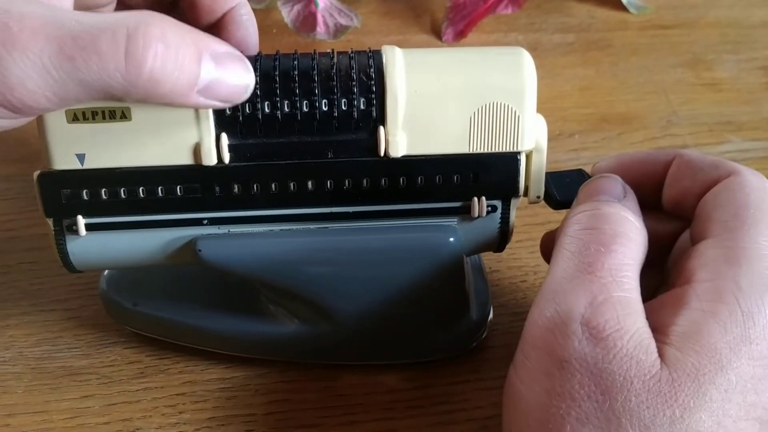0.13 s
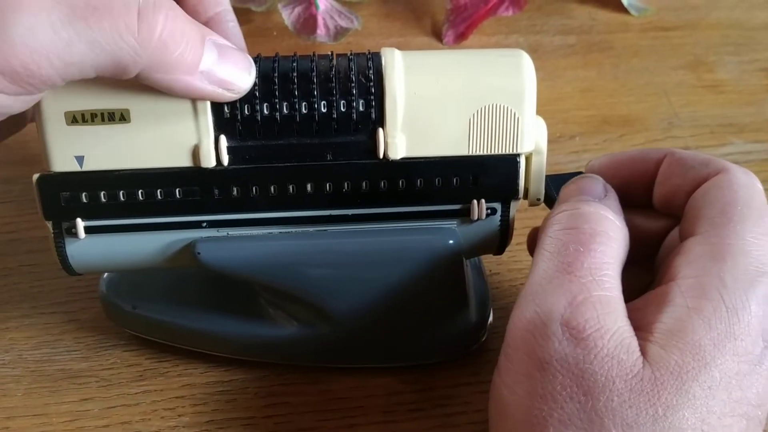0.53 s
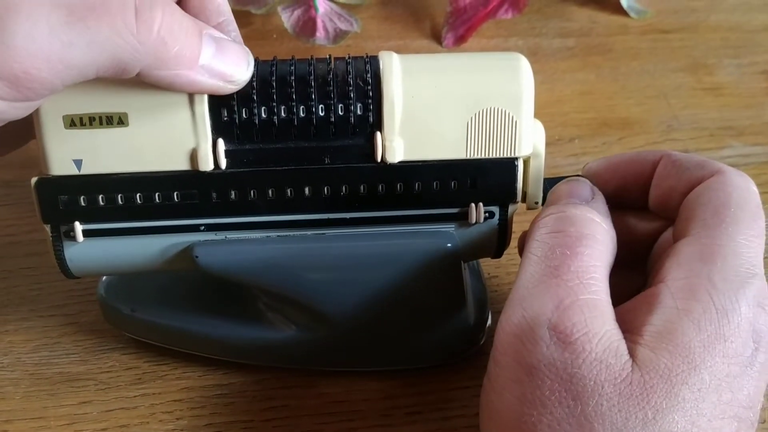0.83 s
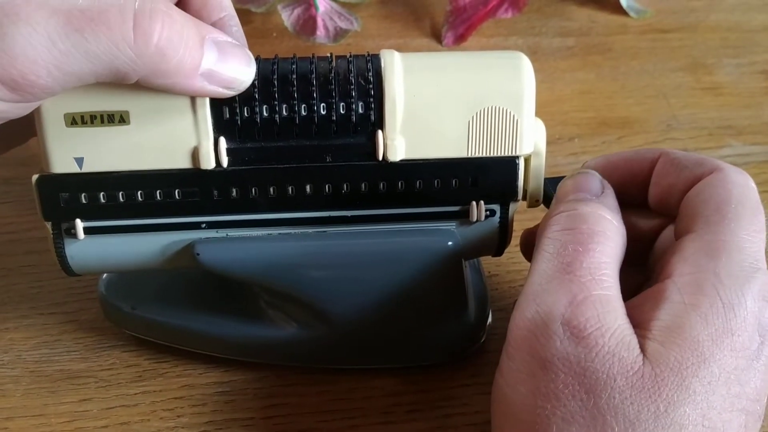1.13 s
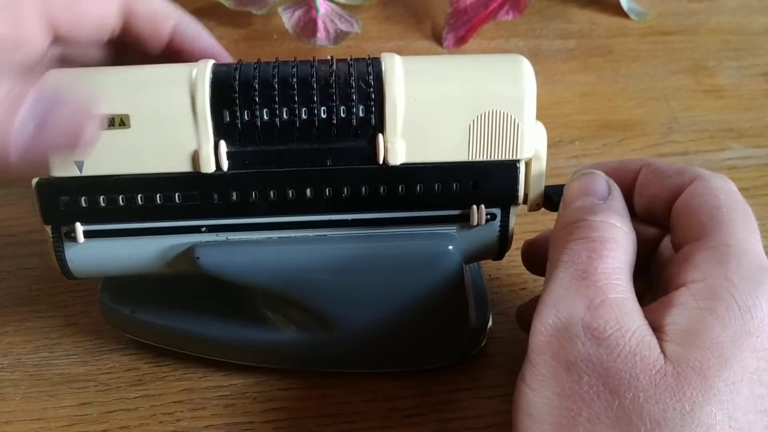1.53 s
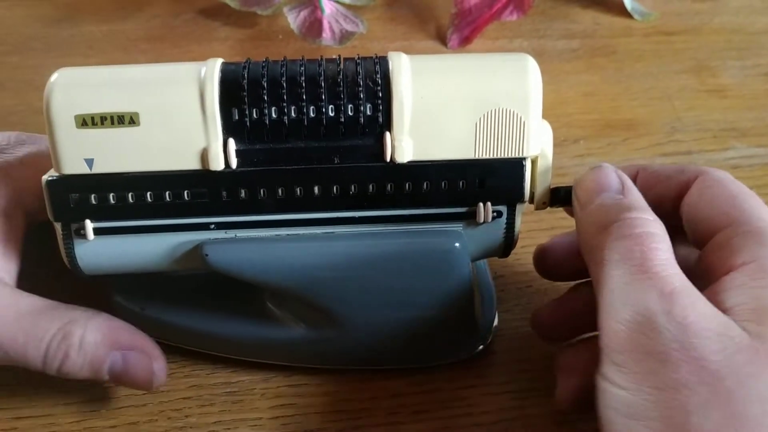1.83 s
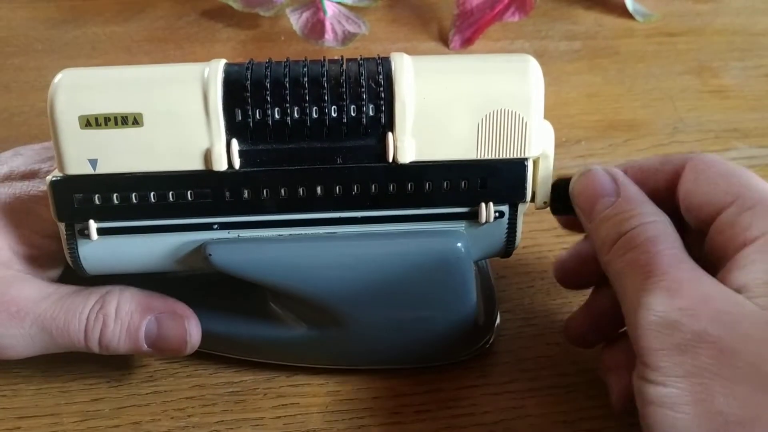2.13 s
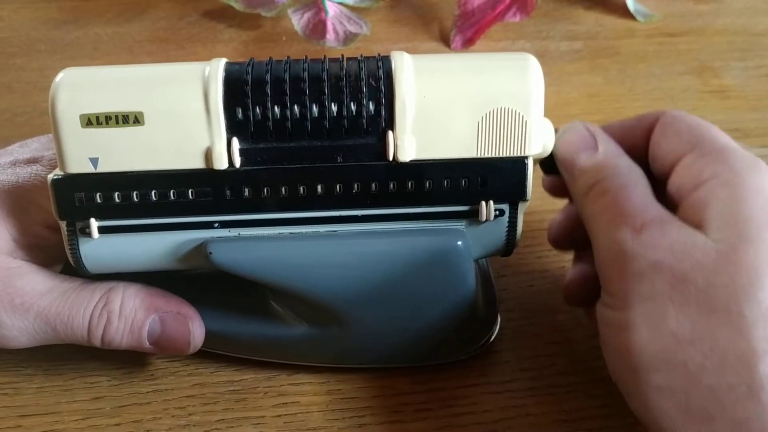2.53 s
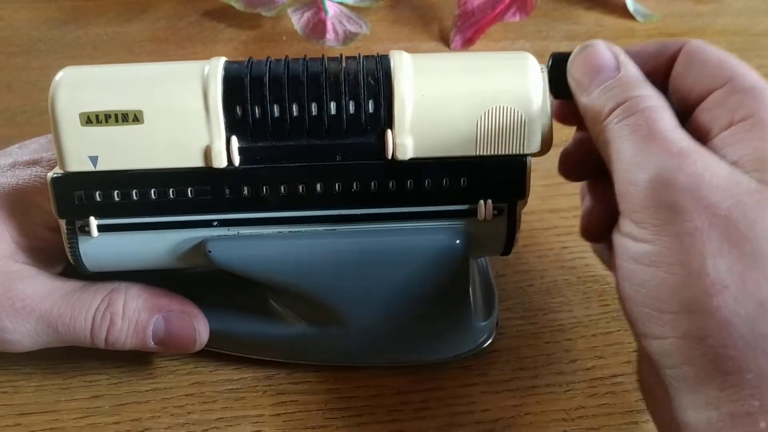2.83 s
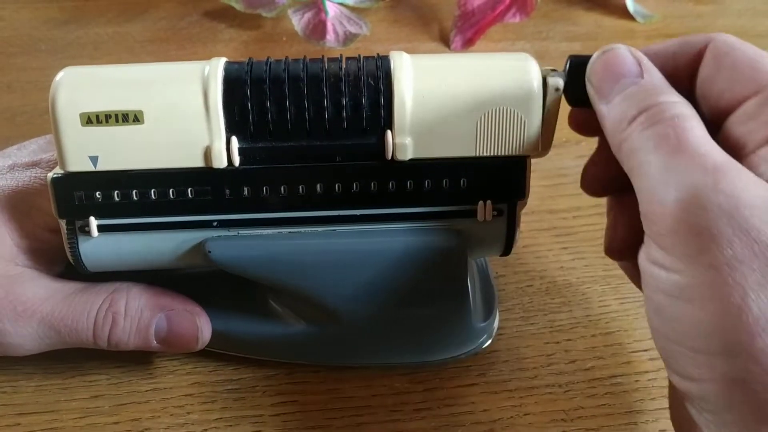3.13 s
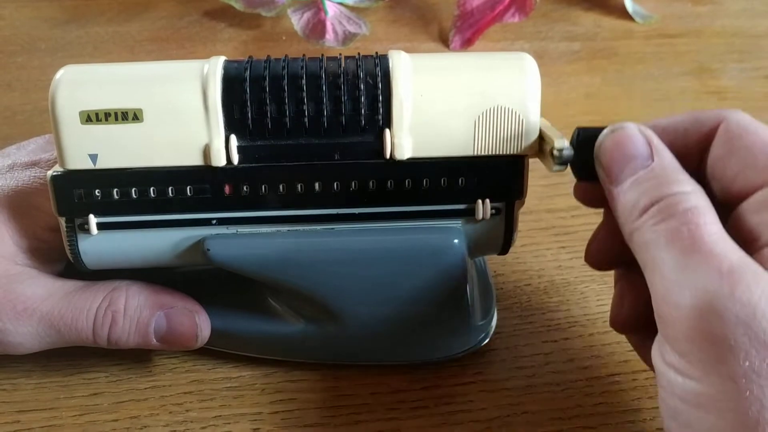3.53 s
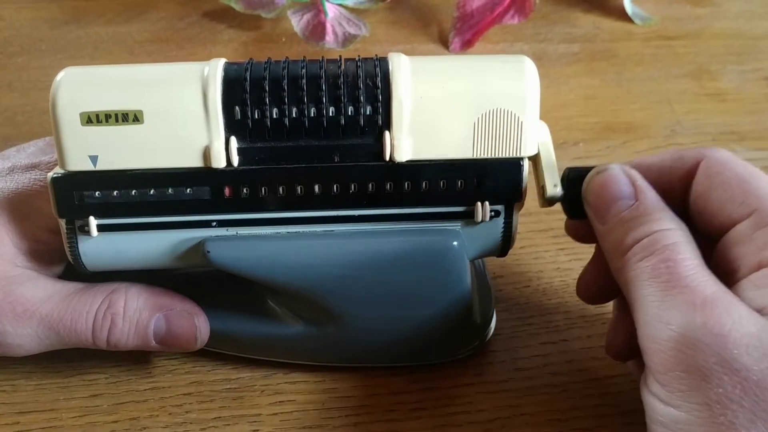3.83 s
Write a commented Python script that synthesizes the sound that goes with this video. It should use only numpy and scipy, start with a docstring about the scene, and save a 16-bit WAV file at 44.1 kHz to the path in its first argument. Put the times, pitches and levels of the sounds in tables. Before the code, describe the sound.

Close up in a small room, a mechanical calculator's lever snaps; a hand slides and bumps the case, then the crank turns with steel clicks, hollow case knocks, low thumps and a final burst of ticking.

```python
"""In a small room, a hand-cranked mechanical calculator stands on a wooden table.
A setting lever snaps into its notch and a hand slides round to steady the case. Then the crank makes one turn:
gears rub, pawls click and clack against the case, the table thumps, and the carry levers rattle at the end.
Rubbing and air are coloured noise; each blow joins short noise bursts with fading tones of steel, case and table."""
import sys
import numpy as np
from scipy import signal
from scipy.fft import rfft, irfft, next_fast_len
from scipy.io import wavfile

SR = 44100
rng = np.random.default_rng(int(sys.argv[2]) if len(sys.argv) > 2 else 0)


def bounce(signal):
    """Save signal as a 16-bit WAV file at the path given by the first command-line argument."""
    frames = np.transpose(np.atleast_2d(signal))
    limited = np.clip(frames, -1, 1)
    pcm = np.round(limited * 32767).astype(np.int16)
    wavfile.write(sys.argv[1], SR, pcm)


N = 176400  # length in samples: 4 s

# How alike left and right are in the air and the room tail: pitch_hz, likeness (0-1)
ALIKE = [(30, 0.16), (120, 1), (300, 0.81), (600, 0.14), (1500, 0.45), (5000, 0.022), (16000, 0.017)]
DETUNE = .021  # random pitch spread of the case, table and hollow tones, as a fraction


def amp(db):
    """Turns decibels into a gain."""
    return 10 ** (np.asarray(db) / 20)


def evened(x):
    """Scales a sound to an rms (average strength) of 1."""
    return x / np.sqrt(np.mean(x ** 2) + 1e-20)


def unit_blow(x):
    """Scales a blow to the energy of 5 ms at rms 1, however long its array is."""
    return evened(x) * np.sqrt(.005 * SR / x.shape[-1])


def read(points, hz):
    """Reads between the points of a table along a log-frequency axis."""
    f, value = np.transpose(points)
    return np.interp(np.log(hz + 1), np.log(f + 1), value)


def level(points):
    """Makes a gain over the whole scene from (time_s, level_db) points."""
    return amp(np.interp(np.arange(N) / SR, *np.transpose(points)))


def add(mix, s, sound):
    """Mixes a sound into both channels, starting at s seconds."""
    part = mix[:, round(s * SR):][:, :sound.shape[-1]]
    part += sound[..., :part.shape[-1]]


def colour(x, spectrum):
    """Filters x to a (pitch_hz, level_db) spectrum without any sound before its start (minimum phase)."""
    size = next_fast_len(x.shape[-1] + 4096)
    hz = abs(np.fft.fftfreq(size, 1 / SR)) + 1
    octaves_below = np.maximum(np.log2(max(spectrum[0][0], 1) / hz), 0)
    octaves_above = np.maximum(np.log2(hz / spectrum[-1][0]), 0)
    # beyond both ends it falls 20 dB per octave, down to -100 dB
    db = np.maximum(read(spectrum, hz) - 20 * (octaves_below + octaves_above), -100)
    log_gain = np.log(amp(db))
    response = np.exp(np.conj(signal.hilbert(log_gain)))[:size // 2 + 1]
    return irfft(rfft(x, size) * response, size)[..., :x.shape[-1]]


def noise_pair(size, alike):
    """White noise in two channels; the right one shares the given part of the left one."""
    a, b = rfft(rng.standard_normal((2, size)))
    alike = np.clip(alike, -1, 1)
    return irfft(np.array([a, alike * a + np.sqrt(1 - alike ** 2) * b]), size)


def grainy(size, per_s, spread_db, share, alike=.33):
    """Rubbing noise whose strength follows tiny irregular ticks."""
    tick_t60_s = .012
    tick_gain = amp(spread_db * np.minimum(rng.exponential(1, size), 3))
    ticks = (rng.random(size) < per_s / SR) * tick_gain
    # each tick leaves a short fading trail
    grain = evened(signal.lfilter([1], [1, -amp(-60 / (tick_t60_s * SR))], ticks))
    return noise_pair(size, alike) * (1 - share + share * grain)


def low_cut(x):
    """A gentle high-pass at 89 Hz keeps the deepest bass out."""
    return signal.sosfilt(signal.butter(2, 89, "high", fs=SR, output="sos"), x)


def ring(modes, t, detune):
    """Fading tones of a struck body, with pitches and levels a little different each time."""
    level_spread_db = 2
    total = 0
    chance = rng.standard_normal((len(modes), 2))
    for k, ((hz, db, t60), (a, b)) in enumerate(zip(modes, chance)):
        fade = amp(db + level_spread_db * b - 60 * t / t60)
        # every other tone starts downwards
        total = total + (-1) ** k * fade * np.sin(2 * np.pi * hz * (1 + detune * a) * t)
    return total


def air():
    """Low room noise and a thin hiss: steady coloured noise with a slowly changing level."""
    # Colour of the room air: pitch_hz, level_db (per Hz, relative)
    air_colour = [(25, -44), (55, -44), (72, -32), (95, -20), (125, -25), (165, -15), (210, -3), (250, -2),
                  (280, 0), (315, -9), (360, -7), (480, -14), (830, -17), (1100, -22), (3000, -24),
                  (16000, -25)]
    # Its level: time_s, level_db
    air_level = [(0, -55.5), (.65, -56), (1.1, -58.5), (1.85, -59.5), (3, -58.5), (4, -57.5)]
    left_late_s = .00034
    alike = read(ALIKE, np.fft.rfftfreq(N, 1 / SR))
    left, right = evened(colour(noise_pair(N, alike), air_colour))
    return level(air_level) * np.array([np.roll(left, round(left_late_s * SR)), right])


def room(x):
    """Echoes off the room blur into a short tail that swells just after each sound; each pitch fades at its own rate."""
    # Reverberation: pitch_hz, t60_s (time to fade by 60 dB), level_db (relative)
    tail_bands = [(157, 0.78, 4), (397, 0.24, -9), (1050, 0.33, -15), (2900, 0.25, -16.5),
                  (7600, 0.21, -16.5), (15000, 0.12, -19)]
    gap_s, swell_s = .011, .014
    size = SR * 3 // 5
    noise = noise_pair(size, read(ALIKE, np.fft.rfftfreq(size, 1 / SR)))
    hz, t, z = signal.stft(noise, SR, nperseg=256)
    t60 = read([(f, s) for f, s, _ in tail_bands], hz)[:, None]
    band_gain = amp(read([(f, db) for f, _, db in tail_bands], hz))[:, None]
    shape = amp(-60 * t / t60) * np.clip((t - gap_s) / swell_s, 0, 1)
    # equal energy in every band first, then its level
    shape *= band_gain / np.sqrt(size * np.mean(shape ** 2, axis=1, keepdims=True))
    tail = signal.istft(z * shape, SR, nperseg=256)[1]
    return signal.fftconvolve(x, tail, axes=1)[:, :N]


def hand():
    """The hand slides along the case with a fine rustle, drags as it lets go and bumps it softly with a hollow ring."""
    # Skin sliding on the case: time_s, level_db
    slide_level = [(1.38, -60.5), (1.55, -58), (1.7, -56.5), (1.82, -59.5), (1.95, -57.5), (2.08, -56.5),
                   (2.2, -58), (2.3, -61)]
    # Colour of the slide: pitch_hz, level_db (per Hz, relative)
    skin_colour = [(500, 0.5), (2000, -2.5), (4500, -4.5), (8000, -3.5), (15500, -5.5)]
    # The palm drags as it lets go: time_s, level_db
    drag_level = [(1.42, -78), (1.45, -56.5), (1.5, -60.5), (1.58, -56.5), (1.66, -66.5), (1.73, -68.5),
                  (1.8, -79)]
    # Colour of the drag: pitch_hz, level_db (per Hz, relative)
    palm_colour = [(200, 0), (330, 2.5), (450, -1), (560, 7.5), (680, -9.5), (950, -8.5), (1600, -19)]
    # Soft bumps as the hand lets go: start_s, level_db
    bumps = [(1.445, -47), (1.521, -59), (1.553, -57), (1.598, -53)]
    # Hollow ring of the bumps: pitch_hz, level_db (relative), t60_s
    hollow_tones = [(549, 3.5, 0.079), (590, 6, 0.064), (790, -4, 0.06), (990, -8, 0.054)]
    rustle = grainy(N, per_s=600, spread_db=2, share=.2, alike=.034)
    slide = level(slide_level) * evened(colour(rustle, skin_colour))
    drag = level(drag_level) * evened(colour(noise_pair(N, .39), palm_colour))
    out = slide + drag
    t = np.arange(SR // 4) / SR
    for s, db in bumps:
        add(out, s, amp(db) * unit_blow(low_cut(ring(hollow_tones, t, DETUNE))))
    return out


def gears():
    """The gears rub as long as the crank turns: noise roughened by irregular ticks of the teeth."""
    # Friction while the crank turns: time_s, level_db
    friction_level = [(2.2, -80), (2.4, -56), (2.5, -63), (2.55, -50.5), (2.68, -55), (2.8, -58.5),
                      (3.0, -59.5), (3.28, -60), (3.58, -65), (3.66, -64), (3.76, -68), (4, -83)]
    # Colour of the friction: pitch_hz, level_db (per Hz, relative)
    gear_colour = [(60, -19), (110, -11), (200, 16), (450, 2.5), (800, 10.5), (1200, 7.5), (2500, -1),
                   (4500, -0.5), (8000, -3), (15500, -4)]
    rub = grainy(N, per_s=420, spread_db=3.5, share=.55)
    return level(friction_level) * evened(colour(rub, gear_colour))


def rocking():
    """The machine rocks on the table: a low rumble swells and dies, loose parts chatter and springs jangle."""
    # Rocks: start_s, rumble_db and chatter_db (before fading), swell_s and t60_s of the rumble,
    # spring_db (before halving); in the order start_s, rumble_db, swell_s, t60_s, chatter_db, spring_db
    rocks = [(2.578, -52, 0.011, 0.73, -42, -53), (3.109, -48, 0.0096, .43, -41, -48),
             (3.356, -40, 0.023, 0.3, -47, -58)]
    # Colour of the rumble: pitch_hz, level_db (per Hz, relative)
    rumble_colour = [(40, -34), (100, -33), (165, 4), (240, 3), (320, 3.5), (450, -12.5), (900, -23.5)]
    # Colour of the chatter: pitch_hz, level_db (per Hz, relative)
    chatter_colour = [(250, -16), (500, 4.5), (900, -12), (1400, -5), (2200, 3.5), (4000, -3.5),
                      (9000, -37)]
    # Tones of the shaken springs: pitch_hz, level_db (relative), t60_s
    spring_tones = [(1060, -3, 0.38), (1330, -8, .3), (1415, 0, 0.44), (1620, -3, 0.5), (1900, -5, 0.42),
                    (2130, -1.5, 0.4)]
    chatter_t60_s, chatter_rise_s = .084, .0016
    out, t = np.zeros((2, N)), np.arange(SR // 2) / SR
    onset = np.minimum(t / chatter_rise_s, 1)
    for s, db, swell, t60, chatter_db, spring_db in rocks:
        shape = np.minimum(t / swell, 1) * amp(-60 * np.maximum(t - swell, 0) / t60)
        rumble = evened(colour(noise_pair(len(t), .97), rumble_colour))
        add(out, s, amp(db) * shape * rumble)

        rattle = grainy(len(t), per_s=170, spread_db=4, share=.85)
        chatter = evened(colour(rattle, chatter_colour))
        add(out, s, amp(chatter_db) * onset * amp(-60 * t / chatter_t60_s) * chatter)

        # slightly different tones left and right
        jangle = np.array([ring(spring_tones, t, .0051), ring(spring_tones, t, .0043)]) / 2
        add(out, s, amp(spring_db) * onset * jangle)
    return out


def steel_click(t, envelope, ring_db, tick_db):
    """Stiff steel has crowded high tones: three bands of noise bursts, also sent through the ringing frame."""
    # Dense steel tones, lowest group: pitch_hz, level_db (per Hz, relative)
    clack_colour = [(1400, -22), (2100, 3), (2700, 8), (3500, 11), (4350, 6), (5000, 7.5), (6200, -42)]
    # Middle group: pitch_hz, level_db (per Hz, relative)
    ring_colour = [(4000, -39), (5100, -8.5), (6000, -1.5), (7000, -3), (8300, 1), (9800, -9),
                   (11500, -30.5)]
    # Highest group: pitch_hz, level_db (per Hz, relative)
    tick_colour = [(8500, -2), (10200, -3), (12000, -0.5), (14000, -3), (15800, -3.5), (17500, -41)]
    # Strongest tones of the steel frame: pitch_hz, level_db (relative), t60_s
    frame_tones = [(2700, -2, .018), (4250, 1, .018), (4550, 0, .016), (5400, -2, .016), (5930, 0, .018),
                   (6850, -3, .016), (7780, -1, .016), (8720, -1, .016), (11450, -1, .016),
                   (12150, 0, .016), (13050, -1, .016), (13800, 0, .016), (15250, -1, .016)]
    frame_db, frame_detune = -8, .012
    steel = 0
    for group, db in [(clack_colour, 0), (ring_colour, ring_db), (tick_colour, ring_db + tick_db)]:
        steel = steel + amp(db) * colour(noise_pair(len(t), .6) * envelope, group)
    frame_ring = np.array([ring(frame_tones, t, frame_detune), ring(frame_tones, t, frame_detune)])
    frame = signal.fftconvolve(steel, frame_ring, axes=1)[:, :len(t)]
    return evened(steel) + amp(frame_db) * evened(frame)


def case_knock(t, attack, envelope, hard_db):
    """The case rings in a few tones with an equally strong rattle; a harder knock lifts the higher ones."""
    # Tones of the case: pitch_hz, level_db (relative, before hardness), t60_s
    case_tones = [(703, -5.5, 0.032), (1015, -1.5, 0.0051), (1086, 0.5, 0.063), (1174, -2.5, 0.024),
                  (1493, -6, 0.056), (1500, -5, 0.046), (2000, -5.5, 0.0066)]
    middle_hz = case_tones[2][0]
    case = [(hz, db + hard_db * np.log2(hz / middle_hz), t60) for hz, db, t60 in case_tones]
    burst = noise_pair(len(t), .6) * envelope
    rattle = colour(burst, [(hz, db) for hz, db, _ in case])
    return evened(ring(case, t, DETUNE) * attack) + evened(rattle)


def table_thump(t, attack):
    """The wooden table answers a blow with low, quickly fading tones."""
    # Tones of the table: pitch_hz, level_db (relative), t60_s
    table_tones = [(162.1, -12.5, 0.15), (231, -8, 0.15), (297, -7, 0.081), (390, -4, .022)]
    return ring(table_tones, t, DETUNE) * attack


def part_note(t, attack, hz):
    """The struck part sounds one short fading note."""
    part_t60_s = .02
    return np.sin(2 * np.pi * hz * t) * attack * amp(-60 * t / part_t60_s)


def blow(rise, t60, thump_db, knock_db, hard_db, steel_db, ring_db, tick_db, pan_db, part_hz, part_db):
    """Steel strikes steel: a bright click, the note of the struck part, a knock of the case and a thump of the table."""
    thump_trim_db, knock_trim_db, steel_trim_db, part_trim_db = -2, -1, -.5, -2.5
    choke = 1.3  # parts held in contact choke a click faster and faster (power of time)
    crack_db, crack_s = -3, .0005  # each click opens with a very short crack
    t = np.arange(8192) / SR
    rise = max(rise, 1 / SR)
    attack = np.minimum(t / rise, 1) ** 2
    after = np.maximum(t - rise, 0)
    decay = amp(-60 * (after / t60) ** choke) + amp(crack_db) * np.exp(-after / crack_s)
    envelope = attack * decay

    steel = unit_blow(steel_click(t, envelope, ring_db, tick_db))
    knock = unit_blow(case_knock(t, attack, envelope, hard_db))
    thump = unit_blow(table_thump(t, attack))
    part = unit_blow(part_note(t, attack, part_hz))

    metal = amp(steel_db + steel_trim_db) * steel + amp(knock_db + knock_trim_db) * knock
    metal = metal + amp(part_db + part_trim_db) * part
    # the metal sits to one side, the thump in both channels alike
    sides = amp([[pan_db / 2], [-pan_db / 2]])
    return sides * metal + amp(thump_db + thump_trim_db) * thump


def mechanism():
    """All blows of levers and pawls, each from its own place; they reach the left side slightly late."""
    # Blows inside the machine: start_s, rise_s, click_t60_s, thump_db (table), knock_db (case),
    # hardness (dB per octave), steel_db, ring_over_clack_db, tick_over_ring_db, left_minus_right_db (metal only),
    # part_pitch_hz, part_db; blow() trims the thump, knock, steel and part levels
    blows = [(0.7282, 0.00032, 0.0082, -80, -51, -12, -28.5, 16, 2.5, -3, 1080, -43),
             (0.7362, 0.00052, .012, -84, -47.5, 1, -38, 8.5, 2, 15.5, 3250, -45.5),
             (0.7394, 0.0019, 0.0081, -69, -50, 14, -39, 11, 3, -17, 1156, -49),
             (0.962, 0.00063, .0135, -88, -54.5, 14, -60, 2, -12, 0, 1050, -71),
             (1.716, 0.0011, 0.014, -64, -66, 2, -46, 10, 2, -2.5, 1450, -58),
             (2.064, 0.01, .027, -64, -65, 0, -50.5, 17, -5, -9, 6850, -56),
             (2.147, 0.0055, 0.041, -75, -80, 5, -52.5, 5, -4, -15, 7800, -59),
             (2.196, 0.0002, 0.017, -47.5, -46, -1, -42.5, 2, -5, -2.5, 1470, -48),
             (2.29, 0.00031, 0.0059, -49.5, -38.5, 14, -29, 6, -11, -3.5, 1060, -44),
             (2.3231, .0003, 0.021, -63, -46.5, 14, -65, 0, -16, -5.5, 2590, -52),
             (2.379, 0.00047, .0135, -64, -58, 4, -44, 13, 2, 3, 4500, -59),
             (2.388, 0.00024, .0135, -43.5, -38, 32, -41, 5, -10, -6, 1250, -40),
             (2.4137, 0.00015, 0.014, -50, -53, -6, -52, -4, 5, -4, 2100, -47),
             (2.5561, 0.00047, 0.023, -50, -32, 16, -33.5, 12, -3.5, 1, 1530, -37),
             (2.5658, 0.0014, 0.026, -46, -34.5, 5, -34.5, 3.5, 0, -4, 2070, -36),
             (2.5757, 0.0018, 0.019, -62, -43, 13, -40, 9, -6, -6.5, 2880, -33.5),
             (2.582, 0.00045, 0.014, -53, -45, -14, -57, 5, -6, -3, 1280, -48),
             (2.598, 0.00051, 0.011, -44, -63, 9, -63, 0, -10, -4, 1550, -47),
             (2.6452, 0.00066, .012, -49.5, -49.5, -3, -61, 5, -10, -1, 1230, -58),
             (2.651, 0.00053, 0.01, -48, -62, 1, -52, 16, -13, -1, 4500, -60),
             (2.688, 0.00046, 0.014, -50, -52.5, 13, -60, 12, -8, -5, 7840, -55),
             (2.7118, 0.00083, .01, -44.5, -54, -4, -61, 13, -7, -7, 4450, -60),
             (2.7401, 0.00098, .013, -49.5, -63, 4, -56.5, 20, -10, -4, 1160, -57),
             (2.8314, 0.0019, 0.015, -50.5, -53, -3, -54, 0, -6, -14, 1030, -55),
             (2.836, 0.001, 0.018, -45.5, -42.5, -1, -41.5, 7, -6, -2, 2080, -42.5),
             (2.965, 0.0011, 0.018, -54.5, -44.5, 0, -44.5, 3, 0, -0.5, 1087, -40),
             (2.9723, 0.00021, 0.012, -46, -48.5, -17, -45.5, -3, -12, -7, 1070, -49),
             (3.095, .0009, 0.028, -70, -44, 9, -33, 7, 1, 11, 5330, -38),
             (3.101, 0.00019, 0.0089, -66, -34.5, 8.5, -27.5, 10.5, -10, -7, 4370, -32.5),
             (3.1034, 0.00032, 0.011, -42, -31.5, -3, -32.5, 11, -3, -.5, 1420, -27.5),
             (3.1072, 0.00067, 0.01, -43.5, -43, 6, -33, 10, -1, 6, 650, -41.5),
             (3.2882, 0.00054, 0.025, -45.5, -73, 4, -36, 26, 7, 0, 4400, -48.5),
             (3.2931, 0.0016, .0135, -67, -43.5, 4, -41.5, 4, 7.5, -1.5, 1580, -49),
             (3.346, 0.00069, 0.006, -63, -38.5, 1, -33.5, 14, -6, -4, 1095, -37.5),
             (3.3484, 0.00045, 0.007, -42.5, -46, 5, -34.5, 13, -2, 7, 4420, -35.5),
             (3.352, 0.00035, 0.013, -36, -43, 6, -20.5, 16.5, -0.5, -3, 2700, -48),
             (3.647, 0.0039, 0.033, -58, -59, 2, -49.5, 3, 10, -3, 1500, -62),
             (3.7185, .0007, 0.033, -52.5, -49, 2, -41, 2, 7.5, -2, 6400, -50),
             (3.7301, 0.00051, 0.018, -49.5, -41, -4, -49, 7, -8, -2, 1100, -37),
             (3.7966, 0.0023, 0.012, -60, -65, 4, -28, 3, 12, -6, 3110, -38),
             (3.8076, 0.00055, 0.0074, -63, -59, 9, -37, 10, 0, 0, 5350, -48),
             (3.809, 0.00041, 0.016, -61, -44.5, 4, -27.5, 19, 6, -1, 5300, -43),
             (3.8148, 0.0011, 0.032, -53, -45, 9, -38, 9, -5, 0, 9100, -43),
             (3.822, .0008, 0.044, -50, -45, 0, -37, 6, -9, -4, 4600, -45),
             (3.833, 0.0017, 0.028, -47, -49, 15, -39.5, 7, 5, 6, 1200, -47),
             (3.8448, .0007, 0.008, -47, -46, 21, -30.5, 7, 14, -7.5, 2270, -41),
             (3.848, 0.00035, 0.018, -46, -38, -1, -33, 14, 3, 4, 4330, -55),
             (3.8509, 0.00041, 0.0062, -47.5, -38.5, -8, -39, -1, -7, 4, 1310, -49),
             (3.855, 0.00048, .017, -51.5, -39.5, 2, -31.5, 12, 2, -9, 1024, -37),
             (3.856, 0.0012, 0.028, -58, -38, 27, -31, 9, -10, 3, 1630, -48),
             (3.8719, 0.0014, .012, -73, -41, 12, -35, 5, 5, 7, 5000, -41),
             (3.8749, 0.0025, 0.016, -54, -46, -4, -24, 9, 16.5, -4, 6060, -33),
             (3.8792, 0.00059, 0.011, -59, -49, 13, -48, 12, 7, 1, 1035, -41.5),
             (3.8865, .001, 0.0093, -59, -59, 13, -43, 9, -4, 5, 4580, -49),
             (3.891, 0.0008, 0.023, -56, -43, 17, -33.5, 11, -1, 1, 7760, -47),
             (3.9014, 0.0019, .017, -55, -62, 14, -38.5, 11, -5, -7, 5420, -43)]
    left_late_s, late_spread_s = .00018, .00003
    out = np.zeros((2, N))
    for s, *row in blows:
        left, right = blow(*row)
        late_s = left_late_s + late_spread_s * rng.standard_normal()
        add(out, s, np.array([np.roll(left, round(late_s * SR)), right]))
    return low_cut(out)


def scene():
    """The calculator, the hand and the room; the rocking and the air get no room tail."""
    near = mechanism() + hand() + gears()
    return near + room(near) + rocking() + air()


def record(dry):
    """Takes away the highest treble, above about 16.1 kHz."""
    treble_cut = signal.firwin(255, 16100, window=("kaiser", 9), fs=SR)
    return signal.oaconvolve(dry, treble_cut[None], "same")


dry = scene()
out = record(dry)
bounce(out)
```